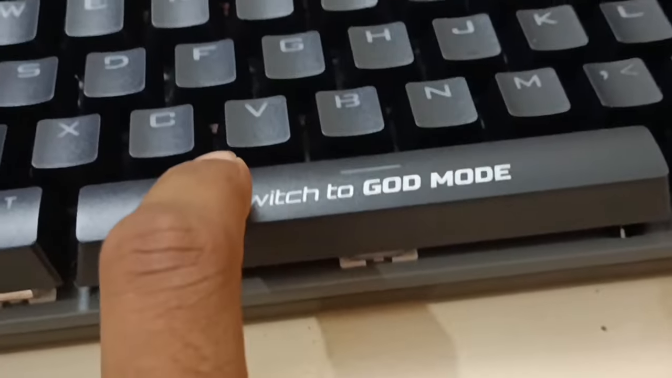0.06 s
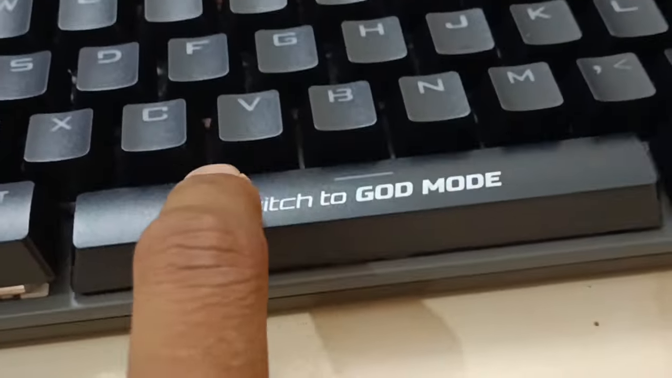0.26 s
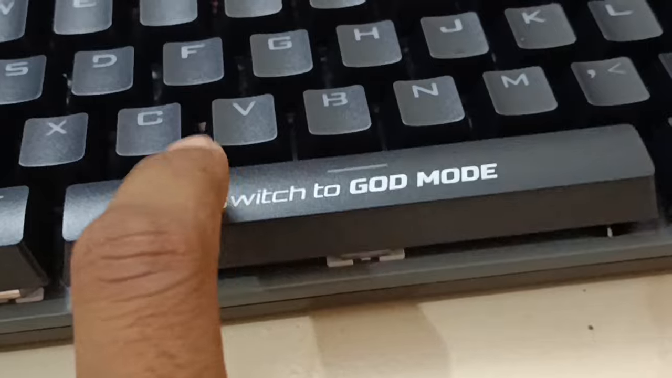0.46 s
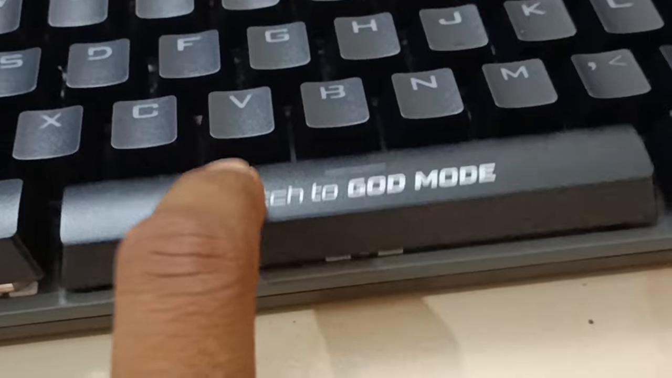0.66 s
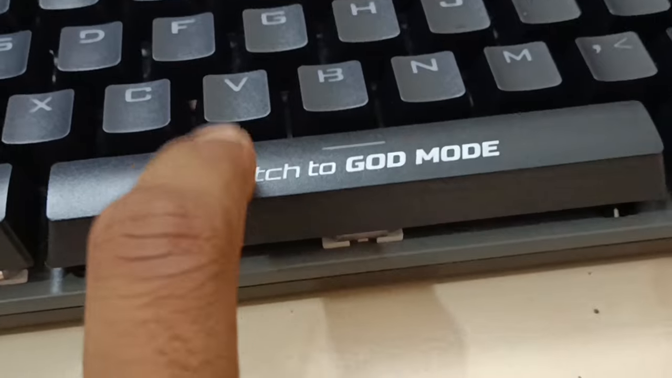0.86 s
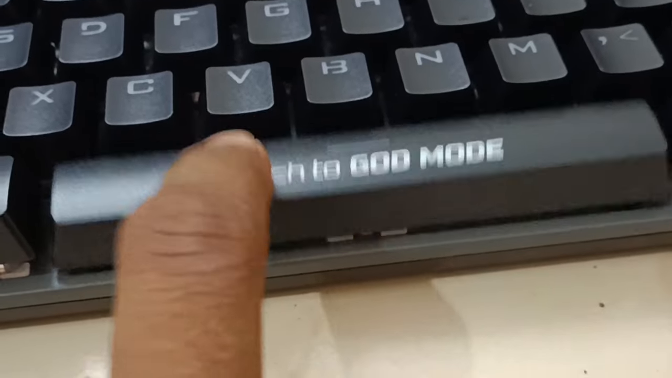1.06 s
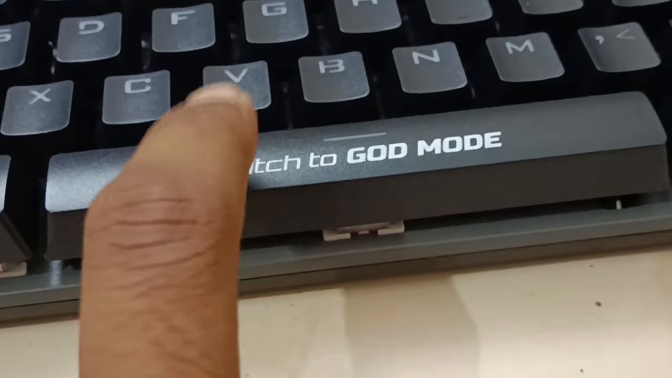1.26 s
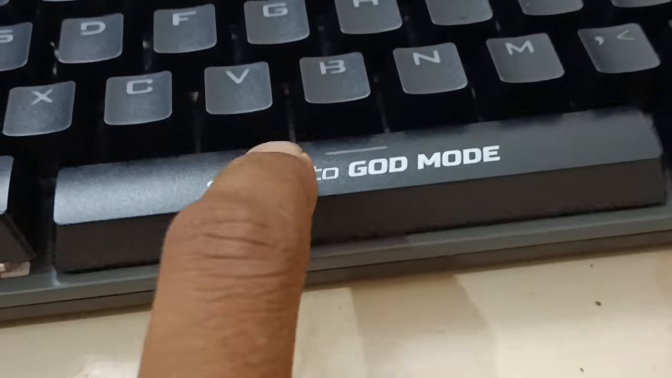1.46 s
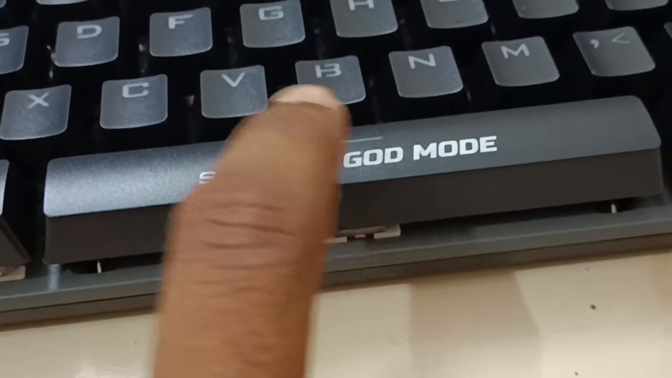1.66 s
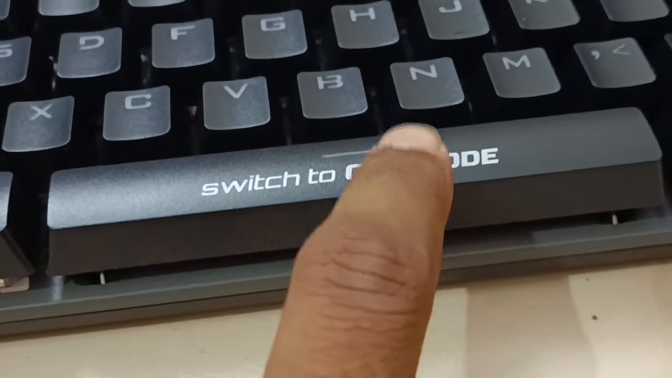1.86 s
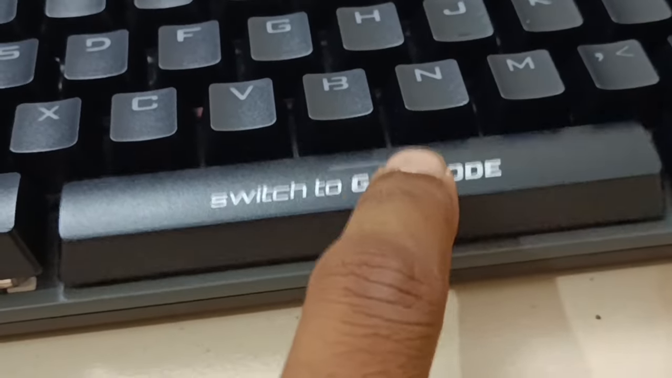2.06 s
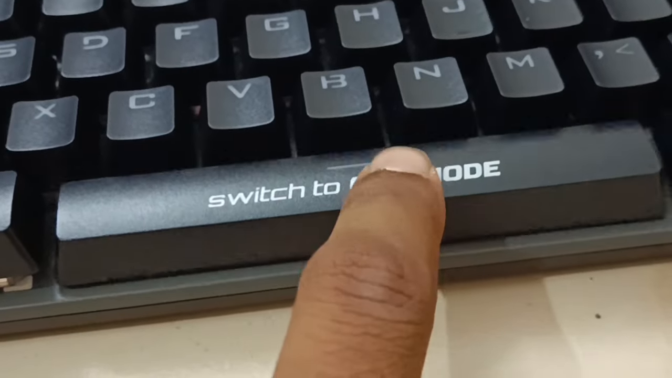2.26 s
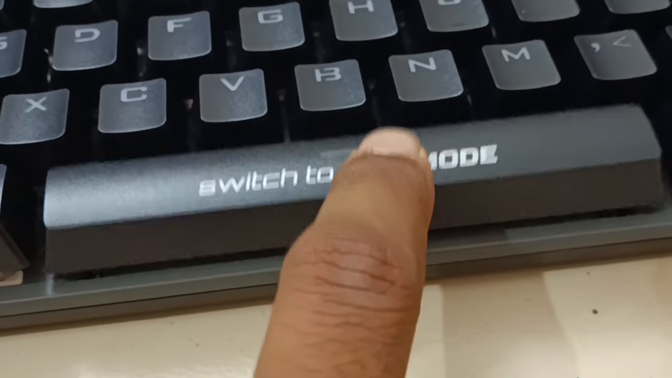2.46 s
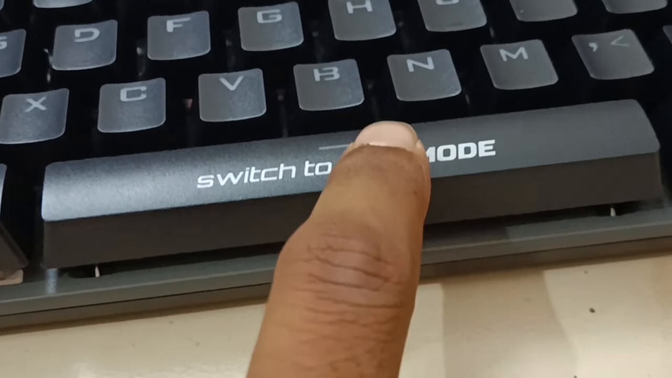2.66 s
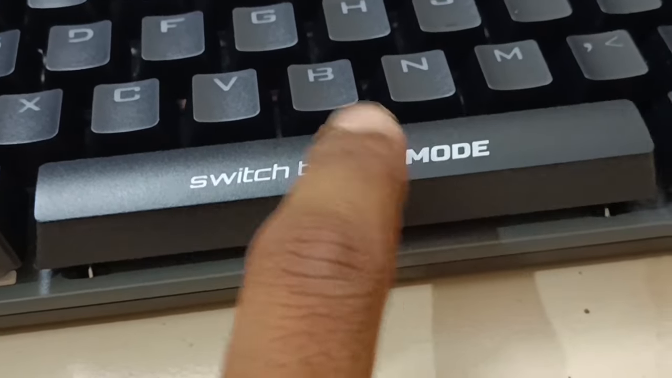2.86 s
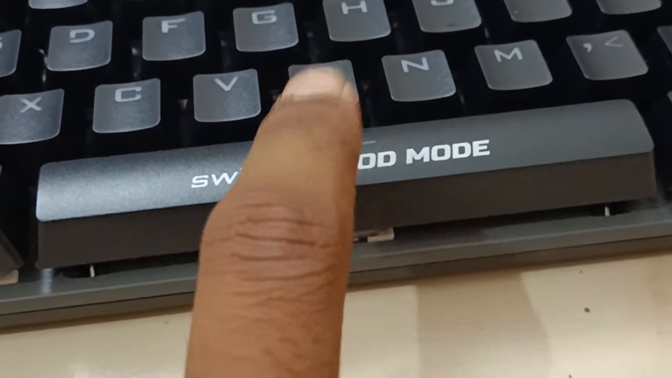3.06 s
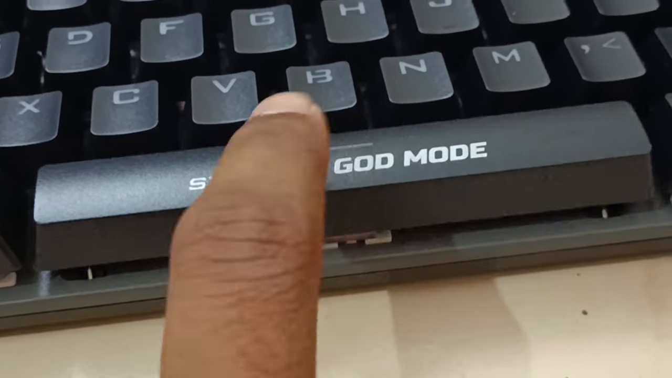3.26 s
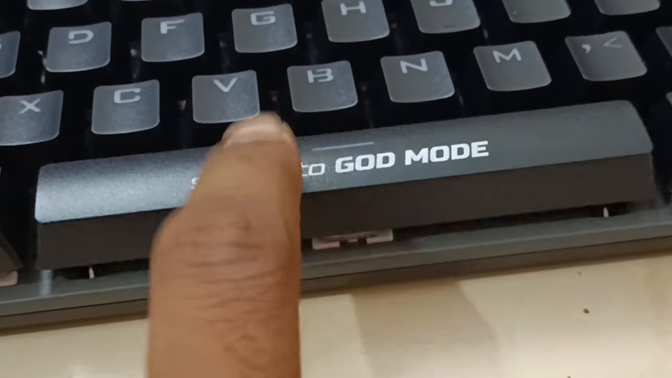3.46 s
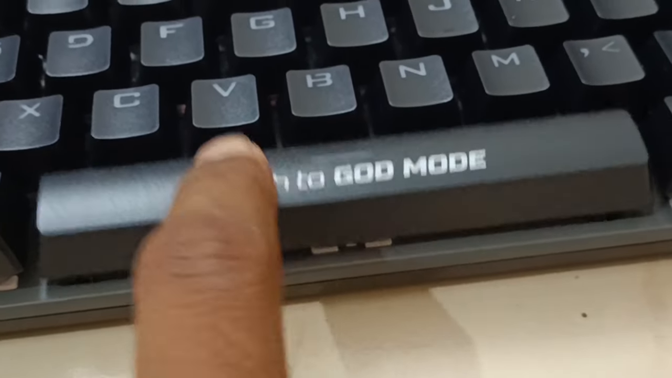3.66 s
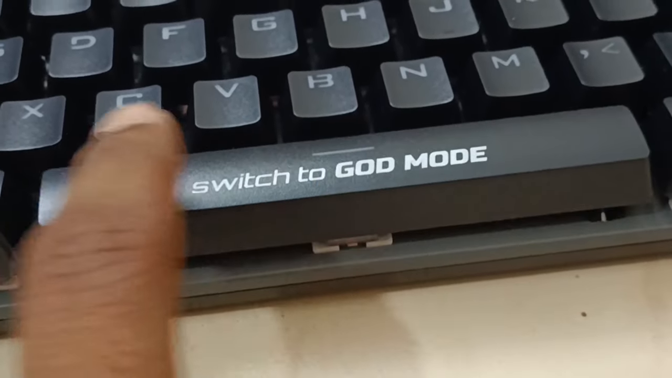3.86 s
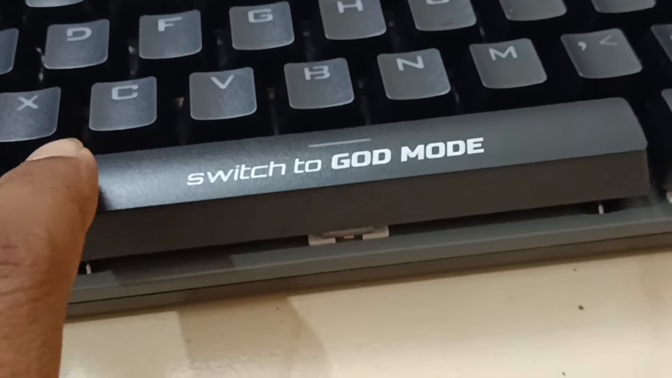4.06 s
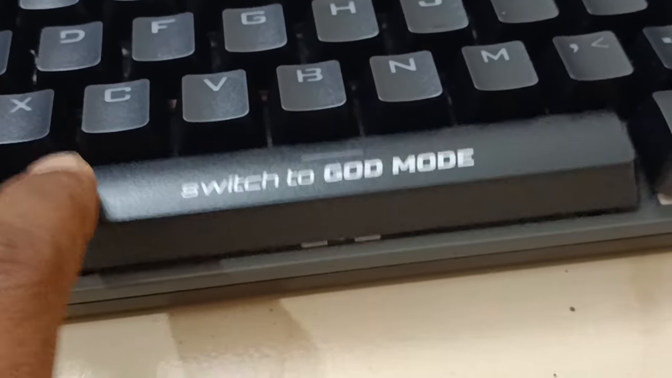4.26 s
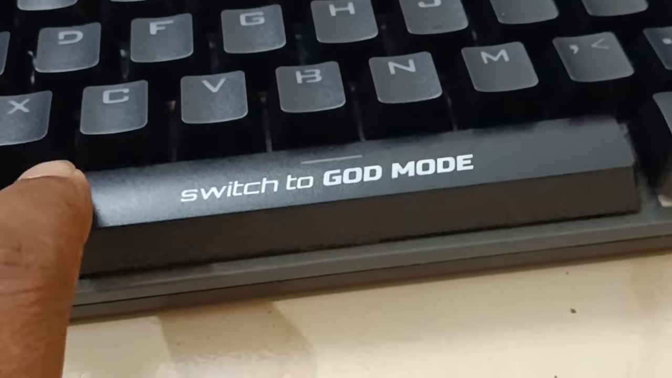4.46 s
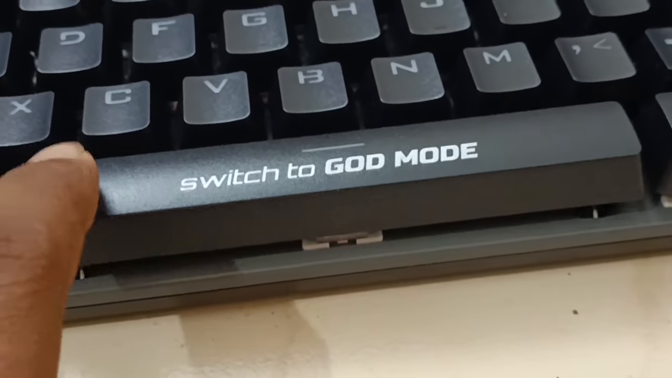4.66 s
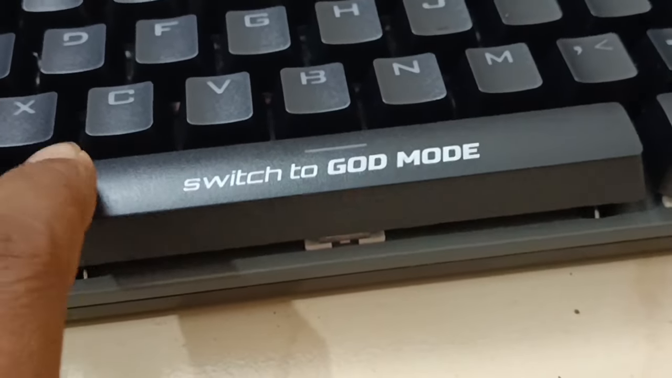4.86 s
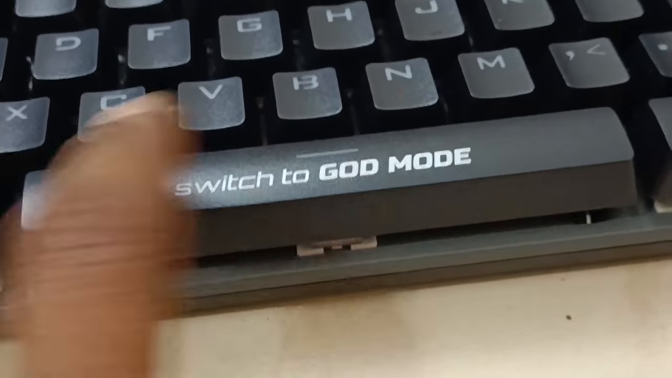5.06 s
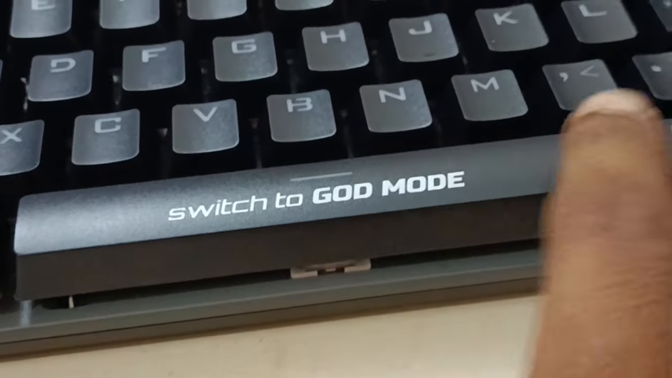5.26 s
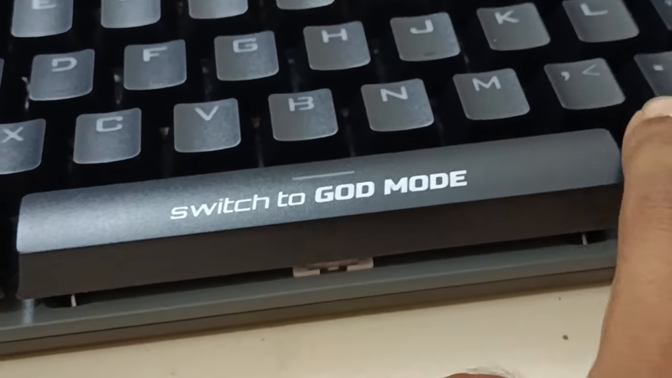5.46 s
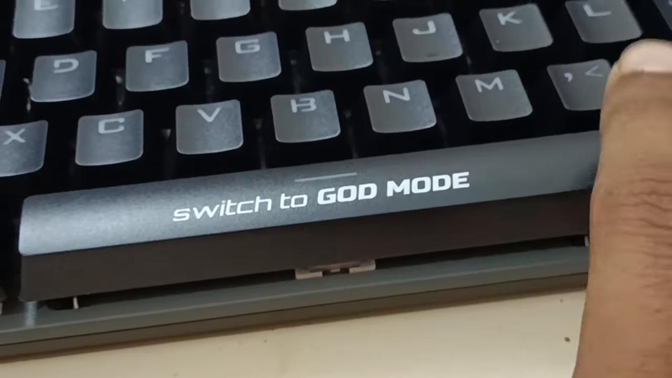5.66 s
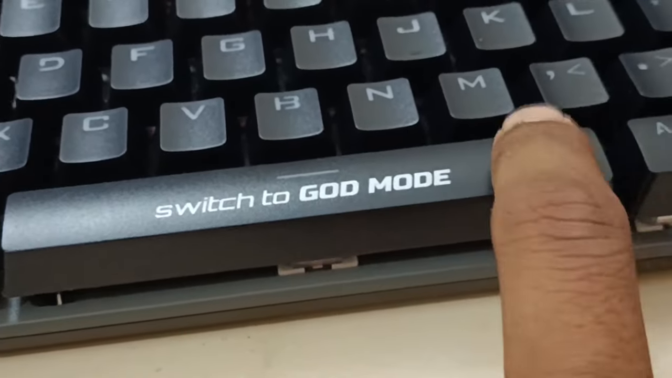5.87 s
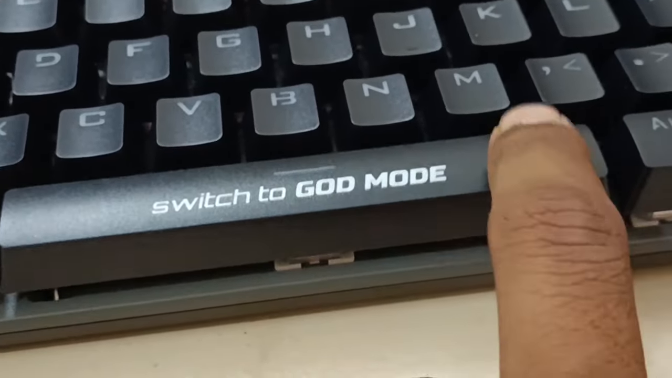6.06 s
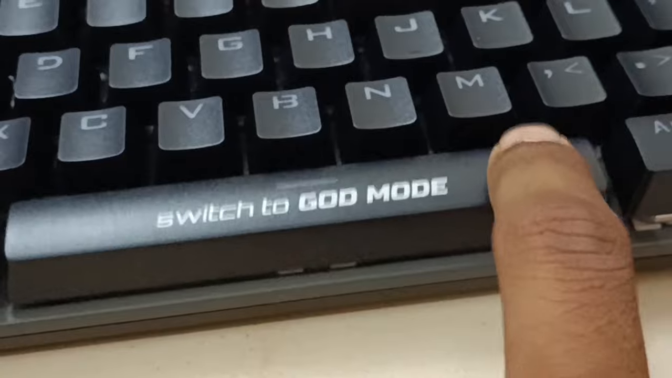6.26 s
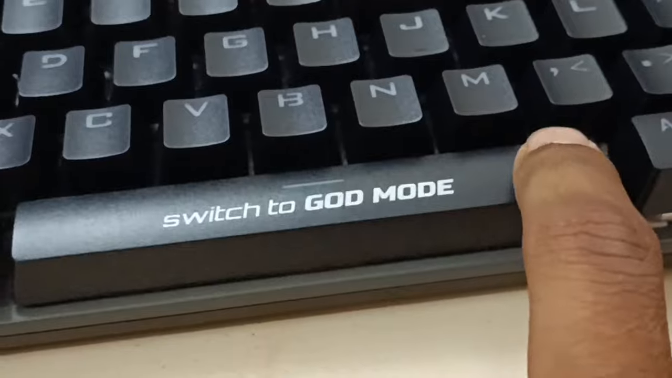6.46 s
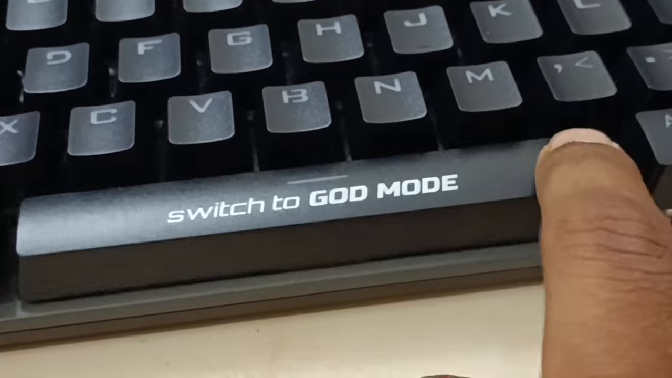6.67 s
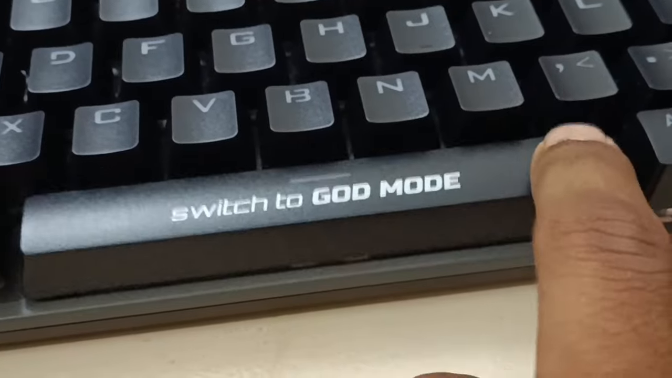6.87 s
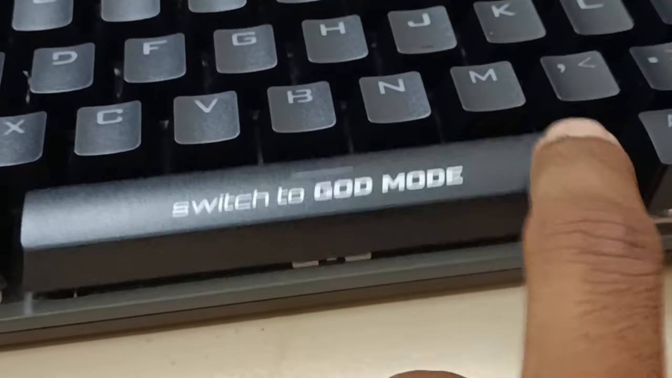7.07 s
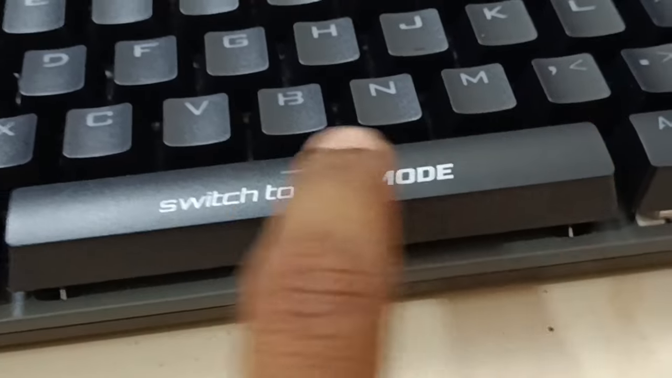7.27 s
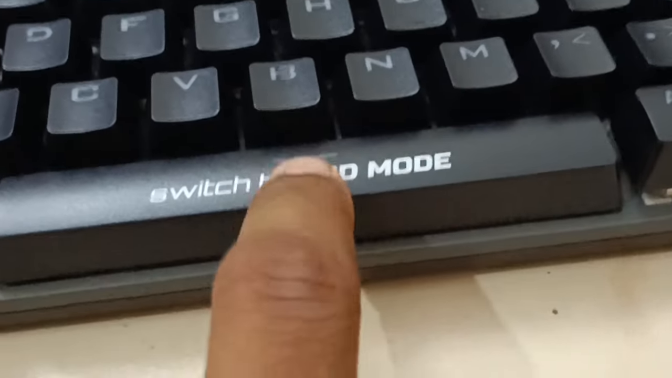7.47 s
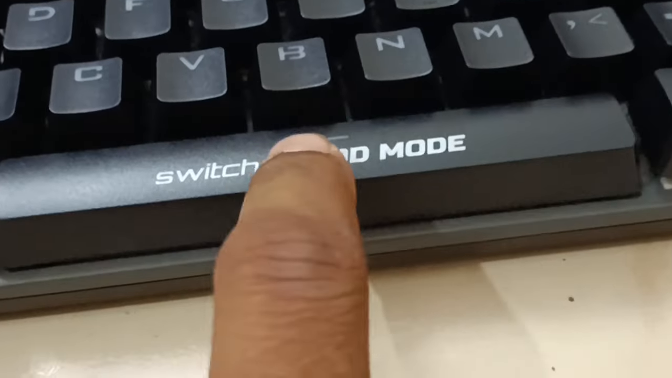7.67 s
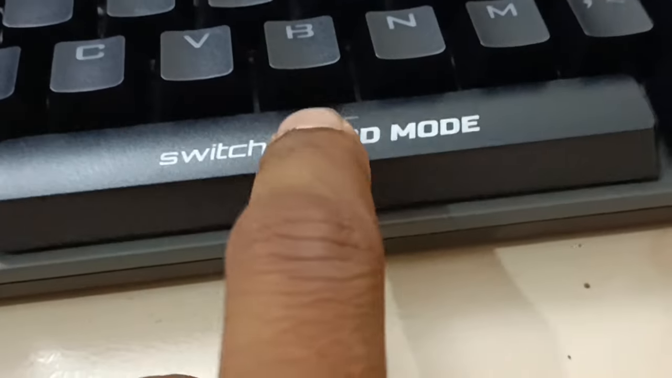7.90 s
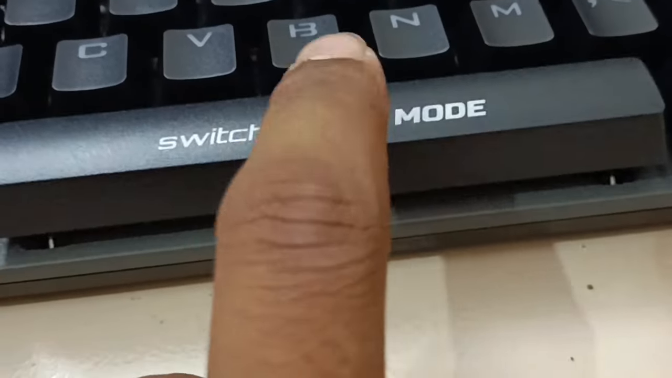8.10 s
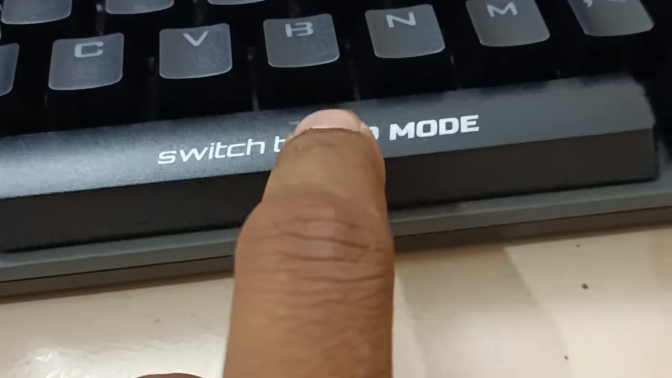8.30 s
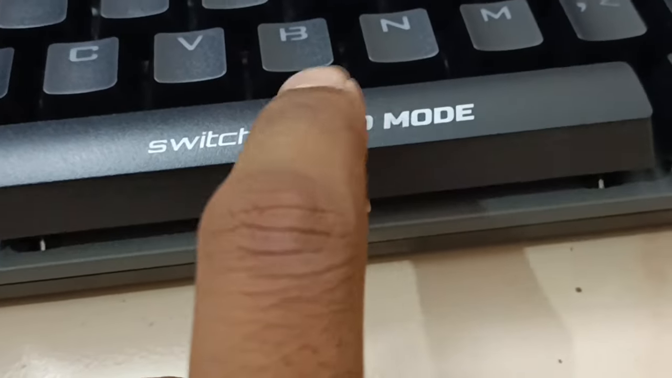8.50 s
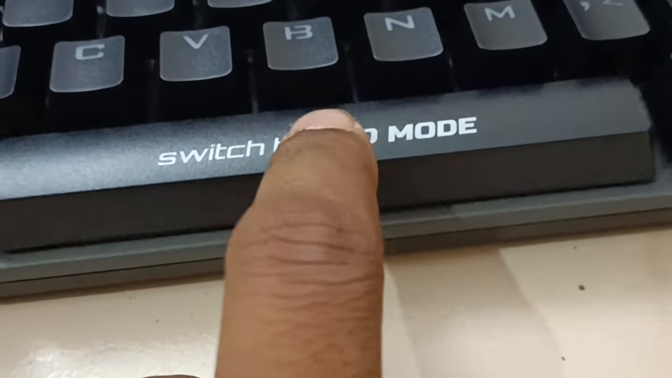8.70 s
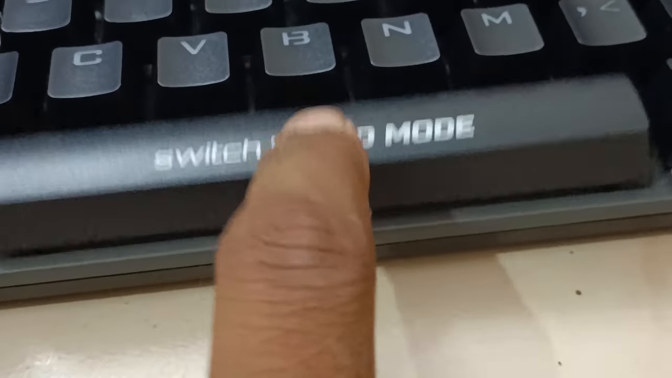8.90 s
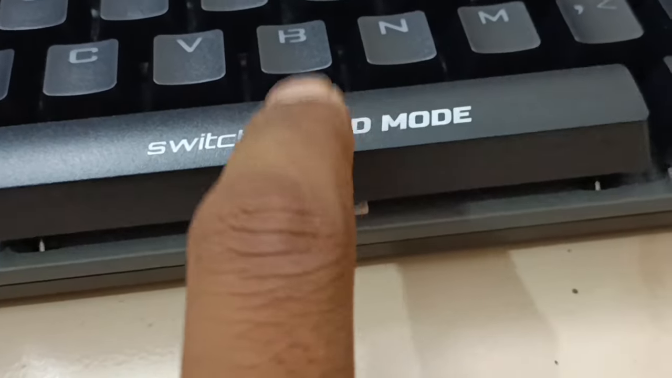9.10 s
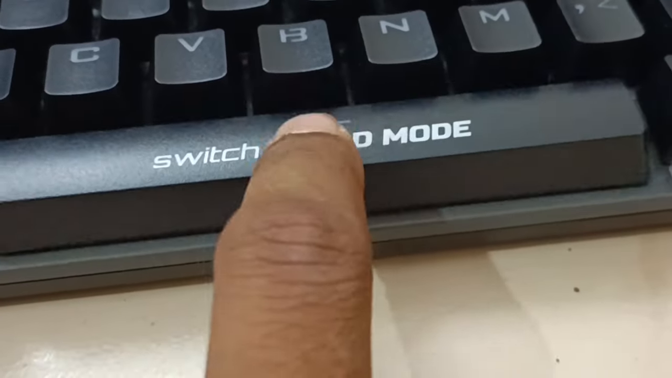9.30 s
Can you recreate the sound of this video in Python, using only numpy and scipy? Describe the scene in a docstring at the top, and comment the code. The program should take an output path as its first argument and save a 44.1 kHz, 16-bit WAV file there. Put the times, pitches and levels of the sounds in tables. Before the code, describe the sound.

Close, uneven run of hollow plastic key clacks with loose rattly returns, over faint steady air noise and low rumble indoors.

```python
"""Throughout: steady air noise and a low rumble from outside, shaped noise heard by a phone's two microphones.
From 0.2 s a finger taps the long bar of a keyboard on a desk, a hand's width away. Each press rattles the loose
bar and wire, then lands with a hollow thock; the return rattles again: bursts of noisy force ring damped modes.
Small ticks mark touch and release. Wavering sine tones enter near 3.7 and 5 s; from 5.2 s the fingertip
sometimes slides as coloured noise. A small room answers all key sounds with an echo and decaying noise."""
import sys
import numpy as np
from scipy import signal
from scipy.fft import rfft, irfft, next_fast_len
from scipy.io import wavfile
from scipy.ndimage import uniform_filter1d

SR = 44100
rng = np.random.default_rng(int(sys.argv[2]) if len(sys.argv) > 2 else 0)


def dump(signal):
    """Clip the signal to [-1, 1] and save it as 16-bit WAV at the path in sys.argv[1]."""
    limited = np.clip(np.atleast_2d(signal).T, -1, 1)
    pcm = np.round(limited * 32767).astype(np.int16)
    wavfile.write(sys.argv[1], SR, pcm)


N = 411894

LEAD_S = 0.012  # event shapes begin this early
BLOW_ENERGY = SR / 125  # per microphone: a 0 dB blow equals rms 1 held for 8 ms

# Modes of the keyboard parts as heard by the two microphones.
# Each row: frequency in Hz, t60 in s, left and right relative level in dB, left phase lead in rad.
CASE_MODES = [(524, 0.11, 1, -16, 0.13), (494.2, 0.07, 25.5, 28, -0.25), (552, 0.036, 18.5, -11, 0.14),
              (670, 0.011, -32, -30, -.4)]
BAR_MODES = [(1057, .05, -48, -9, .3), (1160, 0.26, 1.5, 8.5, 0.11), (1249, 0.023, 1.5, 11, 0.22),
             (1358, 0.043, 6, -6, 0.37), (2409, 0.061, 0.5, -1, 0.5)]
PLATE_MODES = [(1470, 0.028, -6, 8, 4), (1812, 0.11, -41, -15.5, -5.5), (1934, 0.02, 2.5, 9.5, -1.5),
               (2154, 0.011, 11.5, -14.5, 1.14), (2347, 0.05, -7.5, -7, 2.9), (2822, 0.073, -0.5, 1.5, 4),
               (3302, 0.0086, 9, -0.5, -8.5), (3555, 0.0074, 0, -19, 5), (4220, 0.013, -6, -5.5, 0.1),
               (4606, 0.014, -11.5, -2, 4)]
EDGE_MODES = [(4590, 0.022, -4.5, 0, 8.5), (5490, 0.003, 1, 3.5, 5.5), (6530, 0.013, -4, 0, 2.5),
              (7350, 0.0027, -3.5, 2.5, -1), (9330, 0.0027, -0.5, -3.5, 3.96),
              (10080, 0.0045, -4, -4.5, -1.5), (11820, 0.0028, 5.5, -26, -7),
              (14500, 0.0095, -19, -17, -0.9), (14700, 0.0059, -39, -6, 2.2)]
WIRE_MODES = [(1770, 0.17, -6, 2.5, -2.5), (1923, 0.14, -4, -3, -3), (2290, 0.055, 2, -8, -2),
              (2770, .15, -10.5, -15, 3), (3170, 0.12, -25, -10.5, -1)]
# Key presses. Each row: landing in seconds, clack level in dB, slack taken up this long before in ms,
# bar level at that take-up in dB, decay constant of that knock in ms.
PRESSES = [(0.494, -24, 44.4, -29, 4.5), (0.932, -14, 24, -27, 7.2), (1.291, -13, 15.6, -20.5, 7.4),
           (1.644, -14.5, 21.4, -27, 6.2), (2.188, -24, 34.4, -22, 2.9), (2.468, -24.5, 42.4, -23.5, 1.5),
           (2.693, -29.5, 35.7, -22, 2.8), (2.926, -17, 22.8, -21.5, 7), (3.307, -11, 11.2, -21, 3),
           (3.49, -12, 12, -19.5, 6.4), (3.659, -9.5, 12.4, -20.5, 4.8), (3.872, -17, 25.3, -24, 7.3),
           (4.392, -21, 36.6, -28.5, 5.5), (4.719, -25.5, 65.5, -26.5, 3.7), (4.895, -20.5, 24.3, -24, 4.3),
           (5.109, -15, 29, -29, 3.6), (6.158, -18, 28, -26.5, 2.3), (6.392, -20, 26.7, -24.5, 3.5),
           (6.602, -13.5, 16, -22, 8.1), (6.79, -14.5, 15, -18.5, 7.7), (7.172, -13.5, 14.7, -18.5, 1.7),
           (7.614, -10, 11.7, -21.5, 3.5), (7.831, -11.5, 12.7, -17.5, 6.8), (8.047, -10, 13.3, -19, 14),
           (8.5, -18, 32.2, -23.5, 2.1), (8.839, -15, 21, -21.5, 9.4), (9.161, -17.5, 21, -21.5, 8)]
# Fingertip meets the cap. Each row: start in seconds, level in dB.
TOUCHES = [(1.084, -51), (1.58, -42), (1.588, -40), (2.133, -44), (2.642, -41), (2.887, -44), (3.277, -44),
           (3.463, -35), (3.613, -47), (3.628, -42), (4.13, -50), (4.453, -49), (7.583, -38.5),
           (7.694, -38), (7.802, -49), (8.018, -40), (8.44, -44), (8.792, -41.5), (9.118, -40)]
# Fingertip lets go of the cap. Each row: start in seconds, level in dB.
LIFTS = [(1.981, -36), (2.281, -37.5), (2.519, -36.5), (2.733, -42), (3.734, -47), (5.948, -36),
         (6.445, -28.5), (6.666, -27), (6.855, -26.5), (7.473, -32), (8.477, -37), (8.648, -39)]


def undb(db):
    """Decibels to gain."""
    return 10 ** (np.asarray(db) / 20)


def unit(x):
    """Scaled to rms 1."""
    return x / np.sqrt(np.mean(x ** 2))


def band(x, lo_hz, hi_hz):
    """Band-pass along the last axis."""
    sos = signal.butter(2, [lo_hz, min(hi_hz, 0.49 * SR)], "bandpass", fs=SR, output="sos")
    return signal.sosfilt(sos, x)


def curve(rows, quiet=None):
    """Columns of a table at every sample; quiet, if given, outside its span."""
    s, *columns = np.transpose(rows)
    return [np.interp(np.arange(N) / SR, s, column, quiet, quiet) for column in columns]


def uneven(spread_db, size):
    """Slow random gain: noise averaged over size samples, spread in dB rms."""
    return undb(spread_db * unit(uniform_filter1d(rng.standard_normal(N), size=size)))


def coloured(points):
    """Noise with a spectrum of (Hz, dB) points, unrelated left and right, rms 1."""
    hz, db = np.transpose(points)
    size = next_fast_len(N)
    bin_hz = np.arange(size // 2 + 1) * SR / size
    colour = undb(np.interp(np.log(bin_hz + 1), np.log(hz), db))
    return unit(irfft(rfft(rng.standard_normal((2, size))) * colour, size)[:, :N])


def ring(force, modes, contact_s=0.0, stop_s=0.17):
    """A force rings modes until a damper stops them; long contact dulls; mean energy 1 over the microphones."""
    t = np.arange(SR // 8) / SR
    response = 0
    for hz, t60_s, left_db, right_db, lead_rad in modes:
        decay = np.exp(-np.log(1000) * t / t60_s) / np.sqrt(t60_s)
        phase = np.array([[lead_rad / 2], [-lead_rad / 2]])
        response = response + decay * undb([[left_db], [right_db]]) * np.sin(2 * np.pi * hz * t + phase)
    damped = response * np.exp(-(t / stop_s) ** 4)
    pulse = np.hanning(int(contact_s * SR) + 3)[None]
    response = signal.convolve(damped, pulse)
    # small parts radiate little well below their first listed mode
    sos = signal.butter(6, 0.84 * modes[0][0], "highpass", fs=SR, output="sos")
    response = signal.sosfilt(sos, response)
    response = response / np.sqrt(np.sum(response ** 2) / 2)
    return signal.oaconvolve(force, response, axes=1)[:, :N]


def blows(times_s, db, shapes):
    """One force shape per event on the time line; shapes begin LEAD_S early."""
    out = np.zeros((2, N + shapes.shape[-1]))
    for s, gain, shape in zip(times_s, undb(db), shapes):
        i = int((s - LEAD_S) * SR)
        out[:, i:i + shape.shape[-1]] += gain * shape
    return out[:, :N]


def pushes(count):
    """Single-sample impulses of standard energy, one per event."""
    return np.sqrt(BLOW_ENERGY) * np.ones((count, 1))


def chatter(fall_s, rise_s, scrape_db, scrape_s, grain_db, alike):
    """The stem scrapes in, then tiny uneven contacts follow; alike is the share of power both microphones hear."""
    t = np.arange(SR // 25) / SR - LEAD_S
    after = np.maximum(t, 0)
    both, left, right, size = np.moveaxis(rng.standard_normal((len(fall_s), 4, len(t))), 1, 0)
    alike = np.clip(alike, 0, 1)
    force = np.sqrt(alike) * both[:, None] + np.sqrt(1 - alike) * np.stack([left, right], axis=1)
    contacts = (1 - np.exp(-after / rise_s)) * np.exp(-after / fall_s[:, None])
    scrape = undb(scrape_db) * np.exp(-np.abs(t) / scrape_s)
    # contacts clump over about half a millisecond
    clumps = undb(grain_db * unit(uniform_filter1d(size, size=20)))
    force = force * (clumps * (contacts + scrape))[:, None]
    return force * np.sqrt(2 * BLOW_ENERGY / np.sum(force ** 2, axis=(1, 2), keepdims=True))


def hush():
    """Steady air of the room: noise with a fixed spectrum."""
    # Each row: frequency in Hz, relative density in dB per Hz.
    air_spectrum = [(190, -32), (330, -11.5), (421, -21.5), (464, -9.5), (833, -16.5), (1360, -16.5),
                    (2510, -18.5), (4970, -28.5), (6140, -29), (7830, -38.5), (16000, -33)]
    return undb(-54) * coloured(air_spectrum)


def outside():
    """Deep hum, broad swelling rumble with a hump, much alike at both microphones, and wavering tones."""
    # Each row: time in seconds, deep hum level in dB, boom level in dB.
    rumble_levels = [(0, -62, -53), (.35, -55, -49.5), (.93, -53, -50), (1.3, -56.5, -50), (3.1, -62, -51),
                     (3.6, -55, -47.5), (3.78, -55, -46), (3.9, -37.5, -48.5), (4.18, -46, -56),
                     (4.35, -53.5, -49), (5.6, -57, -48), (5.95, -56, -41.5), (6.2, -54.5, -47),
                     (8.4, -61, -50), (9.1, -53, -49), (9.34, -39, -44)]
    # One list per tone. Each row: time in seconds, frequency in Hz, rms level in dB.
    tone_tracks = [
        [(3.68, 135, -57), (3.74, 140, -40), (3.79, 165, -42), (3.87, 172, -49), (3.93, 170, -62)],
        [(4.95, 225, -60), (5.02, 222.8, -47.5), (5.18, 228, -48), (5.26, 228, -62), (5.4, 240.8, -39),
         (5.51, 238, -49), (5.55, 228, -37), (5.6, 233, -64), (5.69, 227, -65), (5.73, 221.5, -39),
         (5.78, 236, -48), (5.83, 233.6, -43), (5.86, 232.4, -56), (5.89, 231, -41), (5.96, 232.6, -48),
         (6.1, 229, -58)],
    ]
    deep_db, boom_db = curve(rumble_levels)
    mid, side = rng.standard_normal((2, 3, N))
    both = mid[:, None] + 0.35 * np.array([[1], [-1]]) * side[:, None]
    deep = unit(band(band(both[0], 49.7, 66), 37, 70))
    slow = uniform_filter1d(uniform_filter1d(rng.standard_normal(N), size=3000), size=3000)
    swell = undb(3.3 * unit(slow))
    hump = unit(band(both[2], 94, 103.2))
    boom = swell * unit(band(band(both[1], 68.0, 276), 74, 430)) + undb(-6.5) * hump
    tones = 0
    for rows in tone_tracks:
        hz = curve(rows)[0]
        level_db = curve(rows, -200)[1]
        tones = tones + undb(level_db) * np.sqrt(2) * np.sin(2 * np.pi * np.cumsum(hz) / SR)
    return undb(deep_db) * deep + undb(boom_db) * boom + tones


def room(x):
    """One echo, sides swapped, then diffuse bands that build, fade and return lumpy, coloured by the modes."""
    # Each row: band centre in Hz, t60 in s, level in dB.
    room_bands = [(499, 0.16, -12.5), (707, 0.27, -12), (1137, 0.13, -13.5), (1783, 0.28, -15),
                  (2260, 0.23, -12.5), (3090, 0.19, -10.5), (4750, 0.2, -13), (7100, .22, -14),
                  (9350, 0.21, -18.5), (14500, 0.17, -15.5)]
    echo_s, echo_db = 0.023, -23.5  # nearest wall
    late = np.pad(x, ((0, 0), (int(echo_s * SR), 0)))[::-1, :N]
    out = undb(echo_db) * band(late, 510, 5000)
    ringing = ring(rng.standard_normal((2, N)), CASE_MODES + BAR_MODES + PLATE_MODES + EDGE_MODES)
    for hz, t60_s, db in room_bands:
        power = np.mean(band(x, hz / 1.215, hz * 1.34) ** 2, axis=0)
        # one decay and two short build-ups
        for smooth_s in (t60_s / np.log(1e6), 0.007, 0.003):
            keep = np.exp(-1 / (smooth_s * SR))
            power = signal.lfilter([1 - keep], [1, -keep], power)
        lumps = uneven(2.6, 300)
        modal = unit(band(ringing, hz / 1.212, hz * 1.222))
        plain = unit(band(rng.standard_normal((2, N)), hz / 1.35, hz * 1.1))
        out = out + undb(db) * lumps * np.sqrt(power) * (modal + 0.63 * plain)
    return out


def slides():
    """Skin on textured plastic: fine hiss, plus slightly catching noise that stirs cap and plate."""
    # Each row: start in seconds, length in seconds, starting level in dB.
    slide_times = [(5.169, .3, -39.5), (5.596, .04, -40), (7.2, .16, -50)]
    # Each row: frequency in Hz, relative density in dB per Hz.
    rub_spectrum = [(470, -17), (800, -6), (907, -23), (1050, -8), (1320, -10), (1370, -14), (1920, -7),
                    (2290, -8.5), (16000, -24.5)]
    # Each row: frequency in Hz, t60 in s, left and right relative level in dB, left phase lead in rad.
    cap_modes = [(1078, 0.12, 1, 0.31, .3), (1295, 0.13, -10, -2, 1.2)]
    attack_s, release_s, fade_db_per_s = 0.042, 0.025, -23
    t = np.arange(N) / SR
    gain = 0
    for s, length_s, db in slide_times:
        level = undb(db + fade_db_per_s * np.clip(t - s, 0, length_s))
        attack = np.clip((t - s) / attack_s, 0, 1) ** 2
        release = np.exp(-np.maximum(t - s - length_s, 0) / release_s)
        gain = gain + level * attack * release
    catching = gain * uneven(0.5, 400)
    cap = ring(catching * rng.standard_normal((2, N)), cap_modes)
    plate = ring(catching * rng.standard_normal((2, N)), PLATE_MODES)
    return gain * coloured(rub_spectrum) + undb(-5) * cap + undb(-9) * plate


def ticks():
    """Touching and letting go also tap the small switch housing."""
    # Each row: frequency in Hz, t60 in s, left and right relative level in dB, left phase lead in rad.
    switch_modes = [(3930, 0.022, 0, -4.5, 0.36), (4550, 0.0031, 5, 4, 1.84), (5270, 0.033, -18, -11, 5.9)]
    s, db = np.transpose(TOUCHES + LIFTS)
    taps = chatter(0.0031 + 0 * s, rise_s=0.00071, scrape_db=-38, scrape_s=0.002, grain_db=8.0, alike=0.52)
    return ring(blows(s + 0.000917, db + 1.5, taps), switch_modes)


def loose_contacts():
    """Every contact short of a landing, as columns: s, clack dB, bar dB, treble dB, decay ms."""
    # Loose knocks, most as the bar springs back against its top stops.
    # Each row: time in seconds, clack level in dB, decay constant in ms.
    knock_times = [(0.197, -57, 12), (0.218, -38, 0.55), (0.237, -22.5, 1.5), (0.419, -52, 14),
                   (0.736, -30, 0.68), (0.751, -22.5, 2), (0.9, -43, 5.8), (1.137, -25.5, 2.5),
                   (1.15, -19.5, 3.2), (1.49, -30, 2.7), (1.5, -21.5, 6.8), (1.509, -16, 1.8),
                   (1.633, -27, 6.9), (2.029, -27, 0.88), (2.043, -36.5, 8.1), (2.314, -30, 1.2),
                   (2.321, -24.5, 4.8), (2.553, -23, 7.9), (2.572, -46, 5.2), (2.671, -44, 4.6),
                   (2.777, -23, 13.4), (3.181, -22.5, 8.2), (3.192, -21.5, 2.4), (3.198, -20.5, 3.9),
                   (3.388, -40, 3.3), (3.403, -21, 5.4), (3.414, -21, 4.4), (3.583, -23, 3.3),
                   (3.595, -28, 3.2), (3.753, -25.5, 3.6), (3.769, -28.5, 1.5), (4.171, -57, 6.3),
                   (4.189, -35, 5.3), (4.209, -49, 4.1), (4.337, -53, 7.7), (4.504, -26.5, 1.4),
                   (4.521, -39, 4.6), (4.632, -54, 8.4), (4.782, -26, 3.1), (4.801, -38, 8.4),
                   (4.885, -45, 2.9), (4.98, -27.5, 2.8), (4.996, -42, 3), (5.448, -53, 6.9),
                   (5.523, -42, 19), (5.668, -20.5, 5), (5.681, -25, 6.7), (5.993, -30.5, 2.8),
                   (6.005, -32, 3.5), (6.106, -59, 5.5), (6.25, -28.5, 2.6), (6.258, -33, 7.1),
                   (6.334, -68, 9), (6.484, -25.5, 2.5), (6.494, -26.5, 3.1), (6.698, -29, 1.1),
                   (6.706, -32, 5.7), (6.881, -25.5, 1.4), (6.89, -30, 5.1), (6.969, -27.5, 3.4),
                   (7.037, -23, 8.5), (7.048, -37, 6.6), (7.487, -17.5, 8.4), (7.707, -19.5, 3.9),
                   (7.713, -22, 3.8), (7.719, -18.5, 3.1), (7.736, -48, 3), (7.911, -37, 4.3),
                   (7.923, -23, 3.1), (7.934, -22, 0.87), (8.289, -36, 7.1), (8.296, -15, 3.1),
                   (8.301, -25, 1.8), (8.486, -41, 4.8), (8.667, -20, 15), (8.686, -35, 4.2),
                   (8.977, -35.5, 0.71), (8.991, -20, 15), (9.004, -22, 2.4), (9.291, -46.5, 1.3),
                   (9.305, -19.5, 1.6), (9.316, -20, 7.5)]
    soft_db = -25  # reference level; harder knocks gain treble
    landing_s, _, lead_ms, bar_db, take_up_ms = np.transpose(PRESSES)
    harder_db = 0.67 * (bar_db - soft_db)
    plate_db = bar_db - 6.5 + harder_db
    take_ups = [landing_s - lead_ms / 1000, plate_db, bar_db, plate_db - 12.5 + harder_db, take_up_ms]

    s, db, ms = np.transpose(knock_times)
    # harder knocks ring the bar relatively less
    knock_bar_db = db - 1 - 0.54 * (db - soft_db)
    knock_treble_db = db - 12.5 + 0.38 * (db - soft_db)
    knocks = [s, db, knock_bar_db, knock_treble_db, ms]

    def finger(rows, bar_db, treble_db, ms):
        """Fingertip contacts with bar and treble levels relative to the clack."""
        return np.transpose([(s, db, db + bar_db, db + treble_db, ms) for s, db in rows])

    touches = finger(TOUCHES, bar_db=-4, treble_db=-16, ms=2.2)  # dull
    lifts = finger(LIFTS, bar_db=-5, treble_db=-1, ms=2.1)  # bright
    return np.hstack([take_ups, knocks, touches, lifts])


def rattles():
    """Loose plastic and wire knock in short clusters, each scraping in; taking up slack adds a clean bar tap."""
    # Each row: frequency in Hz, t60 in s, left and right relative level in dB, left phase lead in rad.
    desk_modes = [(139.6, 0.14, -0.5, 0.5, 0.05), (217, 0.068, 0.5, -3.5, 0.092),
                  (323, 0.035, -8, -4.5, .1), (484, 0.035, -2, 2.5, 0.13)]
    s, db, bar_db, treble_db, ms = loose_contacts()
    fall_s = np.maximum(ms, 0.3) / 1000
    presses = len(PRESSES)
    take_ups = chatter(fall_s[:presses], rise_s=0.00061, scrape_db=-19.5, scrape_s=0.01,
                       grain_db=4, alike=0.63)
    others = chatter(fall_s[presses:], rise_s=0.00029, scrape_db=-19.5, scrape_s=0.0085,
                     grain_db=6, alike=0.62)
    knocks = np.concatenate([take_ups, others])
    clack = blows(s, db, knocks)
    tap = blows(s[:presses] + LEAD_S + 0.00048, bar_db[:presses] - 7, pushes(presses))
    plate = ring(clack, PLATE_MODES, stop_s=0.041)
    bar = ring(blows(s, bar_db, knocks), BAR_MODES, stop_s=0.024) + ring(tap, BAR_MODES, stop_s=0.028)
    treble = ring(blows(s, treble_db, knocks), EDGE_MODES)
    desk_and_wire = ring(clack, desk_modes) + ring(clack, WIRE_MODES)
    return plate + bar + treble + undb(-12.5) * desk_and_wire


def thocks(s, db):
    """Soft pushes into the case: a random mix of a lower and a higher tuning each time."""
    spread = 0.025  # fraction of mode frequency
    share = rng.random(len(s))[:, None]
    out = 0
    for part, stretch in ((share, 1 - spread), (1 - share, 1 + spread)):
        force = blows(s + LEAD_S + 0.0009, db, pushes(len(s)) * part)
        tuned = [(hz * stretch, *rest) for hz, *rest in CASE_MODES]
        out = out + ring(force, tuned, contact_s=0.00059, stop_s=0.016)
    return out


def landings():
    """Hard stop: clean blow plus chatter into plate, wire, bar and edges, softer push into the damped case."""
    s, db = np.transpose(PRESSES)[:2]
    harder_db = db + 15  # above the usual -15 dB clack
    thock_db = db - 2.5 - 0.31 * harder_db
    bar_db = db - 5.5 - 0.35 * harder_db
    treble_db = db - 10 + 0.28 * harder_db
    crack = chatter(0.0026 + 0 * s, rise_s=0.0004, scrape_db=-20, scrape_s=0.003, grain_db=5.5, alike=0.78)
    tick = chatter(0.0025 + 0 * s, rise_s=0.00022, scrape_db=-33, scrape_s=0.0052, grain_db=5.5, alike=0.13)
    clean = blows(s + LEAD_S + 0.0006, db, pushes(len(s)))
    blow = undb(-2) * blows(s, db, crack) + undb(-4.0) * clean
    plate = ring(blow, PLATE_MODES, stop_s=0.0083)  # the finger damps it
    wire = undb(-8.5) * ring(blow, WIRE_MODES)
    bar = ring(blows(s, db=bar_db, shapes=crack), BAR_MODES, stop_s=0.016)
    treble = ring(blows(s, db=treble_db, shapes=tick), EDGE_MODES)
    return plate + wire + bar + treble + thocks(s, thock_db)


def scene():
    """Background, room and keyboard at the two microphones."""
    # The phone turns a little as the finger moves along the bar.
    # Each row: time in seconds, left minus right level in dB.
    phone_turn = [(0, 2), (3.6, -1), (4.3, -1.5), (5.7, -1), (6.3, 0.5), (9.34, 1.5)]
    keys = landings() + rattles() + ticks() + slides()
    turn_db = curve(phone_turn)[0]
    direct = keys * undb([turn_db / 2, -turn_db / 2])
    return hush() + outside() + room(keys) + direct


def record(dry):
    """The microphones drop the deepest bass, clip beyond full scale and cut the top."""
    bass_cut = signal.butter(2, 40, "highpass", fs=SR, output="sos")
    top_cut = signal.ellip(8, 0.2, 45, 16350, fs=SR, output="sos")
    heard = signal.sosfilt(bass_cut, dry)
    return signal.sosfilt(top_cut, np.clip(heard, -1, 1))


dry = scene()
out = record(dry)
dump(out)
```